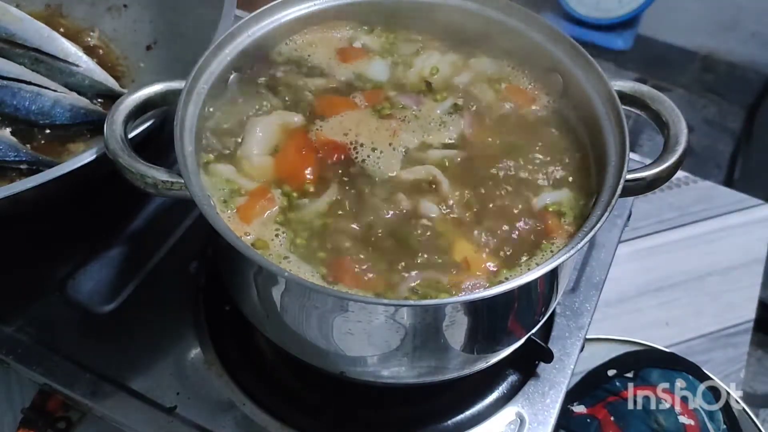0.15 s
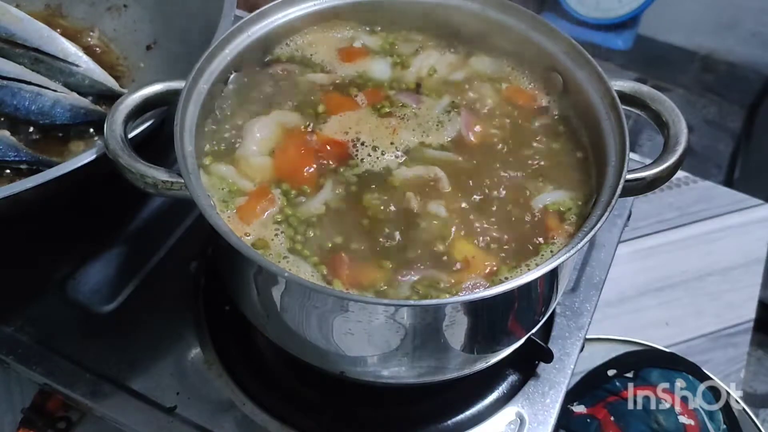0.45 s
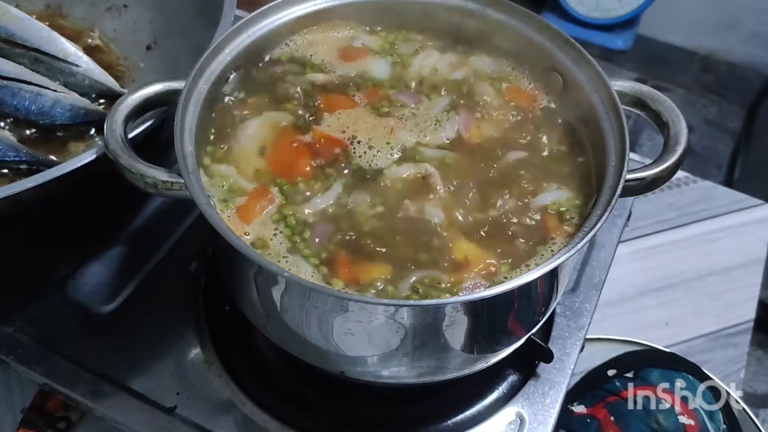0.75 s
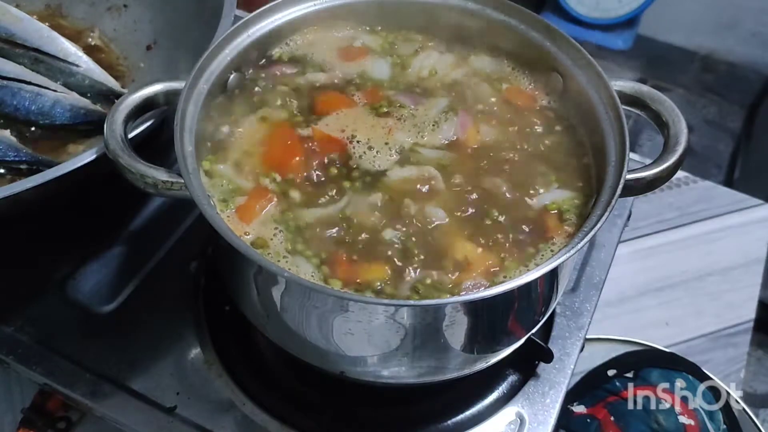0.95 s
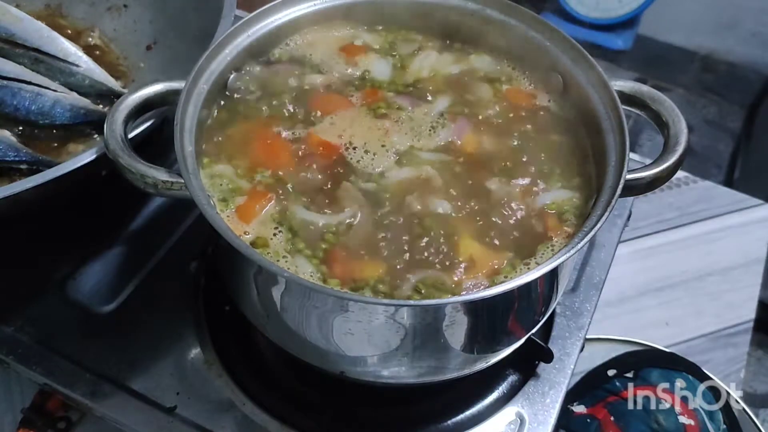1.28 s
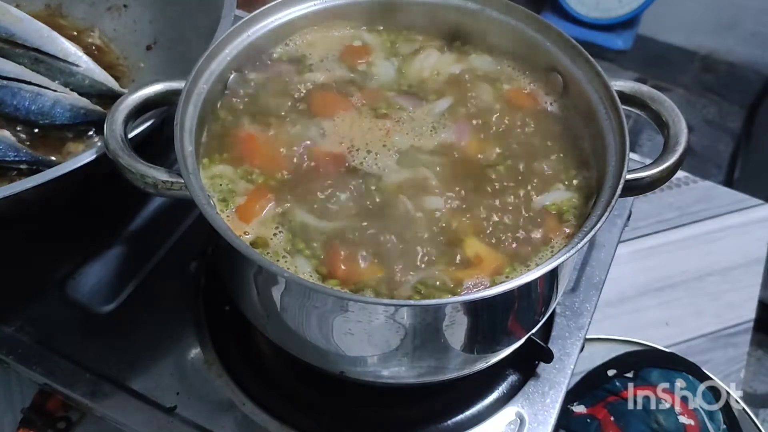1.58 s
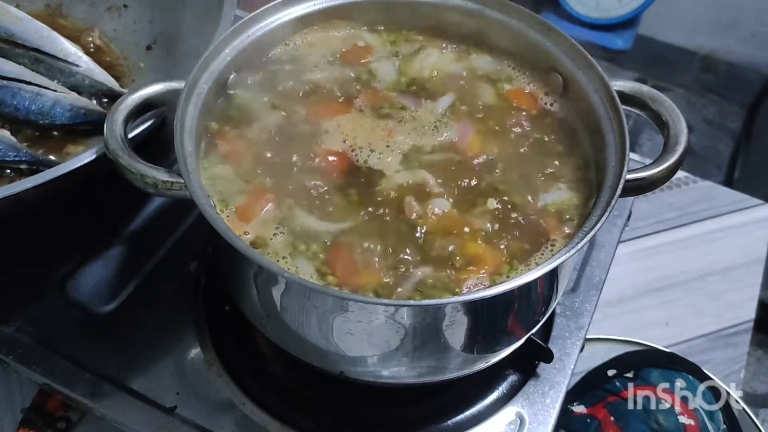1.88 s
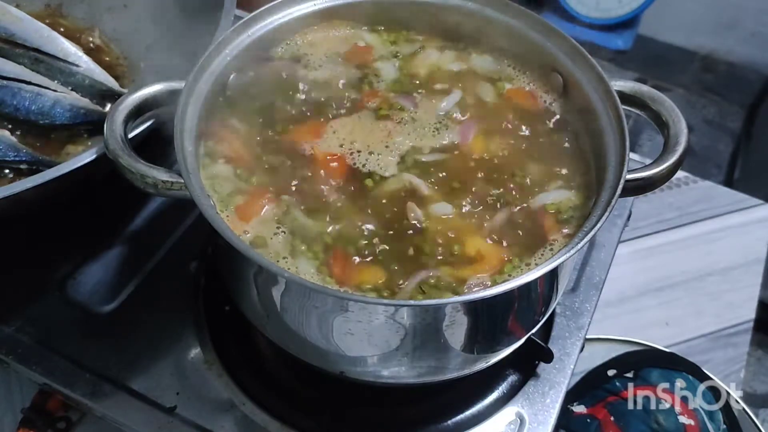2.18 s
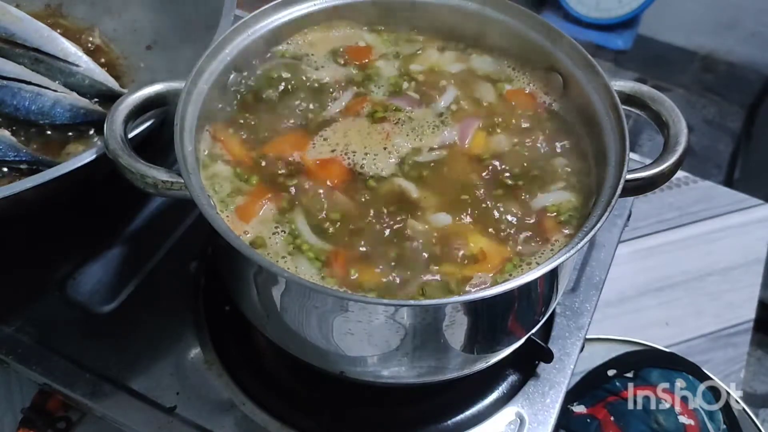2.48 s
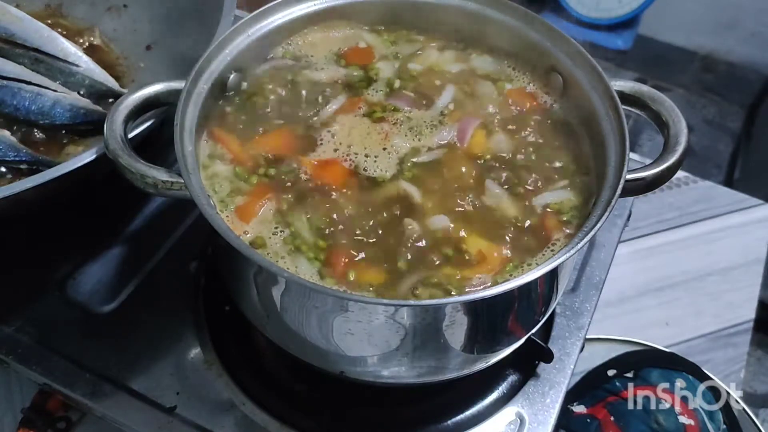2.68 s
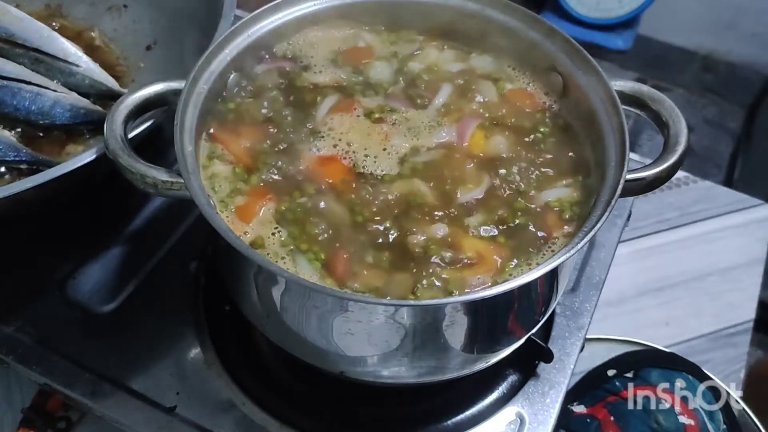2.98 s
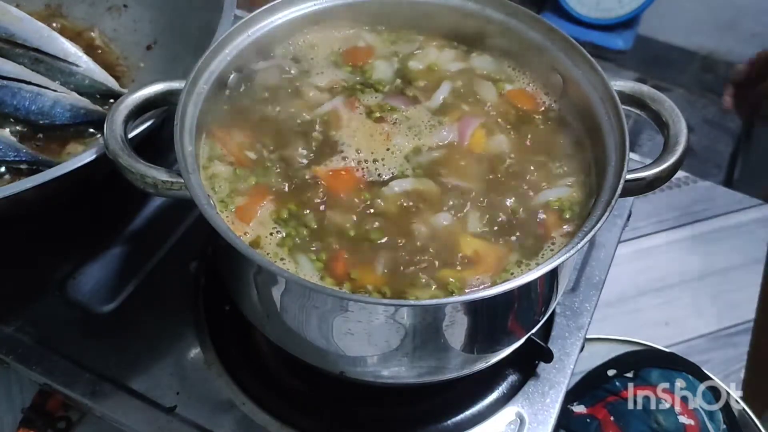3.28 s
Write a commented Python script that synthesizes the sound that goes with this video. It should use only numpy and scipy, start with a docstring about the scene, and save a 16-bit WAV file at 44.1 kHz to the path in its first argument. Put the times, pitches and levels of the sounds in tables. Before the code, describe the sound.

Vegetable soup at a rolling boil in an open steel pot, close stereo microphone in a small kitchen: continuous bright fizzing, fluttering in quick surges, over soft low gurgles and a faint burner hiss.

```python
"""Soup at a rolling boil in an open steel pot, heard from close by through two microphone ports.
Tiny steam bubbles collapse by the thousand on the hot base: random clicks into resonators, raised in
surges and coloured by the ringing pot. Middling bubbles gurgle in clumps the same way, big ones gulp as
rising sine rings, and a few lone collapses snap out. Short reflections surround them; filtered noise
makes the hiss of burner and room."""
import sys
import numpy as np
from scipy import signal
from scipy.fft import rfft, irfft
from scipy.io import wavfile

SR = 44100
rng = np.random.default_rng(int(sys.argv[2]) if len(sys.argv) > 2 else 0)


def inscribe(sig):
    """Save sig as 16-bit PCM at rate SR to the path in sys.argv[1].

    A 1-D sig is mono; a 2-D sig holds one channel per row.
    Samples are clipped to [-1, 1] before scaling.
    """
    pcm = np.round(np.clip(np.atleast_2d(sig).T, -1, 1) * 32767)
    wavfile.write(sys.argv[1], SR, pcm.astype(np.int16))


def to_linear_factor(level_db):
    """Convert decibel levels (scalar or array-like) to linear amplitude factors."""
    exponent = np.asarray(level_db, float) / 20
    return 10 ** exponent


N = 152145   # samples

# Steady fizz of the boil. Each row: time in seconds, relative level in dB.
FIZZ_VIGOUR = [(0.0, -29.5), (0.41, -30), (0.82, -29.5), (1.19, -30.5), (1.41, -29.5), (1.98, -30),
               (2.39, -31), (2.65, -29.5), (3.19, -31), (3.45, -30.5)]
# Surges of collapsing bubbles. Each row: start in seconds, length in seconds, level in dB on the
# scale of the steady fizz, favoured pitch in Hz.
FIZZ_SURGES = [(0.128, 0.017, -21.5, 2970), (0.159, 0.033, -24, 3400), (0.203, 0.041, -26, 2980),
               (0.255, 0.031, -30, 3940), (0.337, 0.04, -25, 2940), (0.455, 0.032, -26.5, 3980),
               (0.495, 0.022, -26, 3300), (0.545, 0.02, -25, 2860), (0.623, 0.025, -31.5, 3800),
               (0.663, 0.0092, -27.5, 4260), (0.758, 0.022, -19.5, 2440), (0.867, 0.043, -32.5, 4130),
               (0.952, 0.043, -27.5, 3590), (1.017, 0.016, -27.5, 3810), (1.157, 0.043, -38, 3120),
               (1.246, 0.028, -23.9, 2800), (1.303, 0.023, -29, 3470), (1.362, 0.037, -28, 3020),
               (1.415, 0.033, -25.3, 2630), (1.515, 0.017, -25.5, 3200), (1.554, 0.031, -30, 4760),
               (1.591, 0.0092, -25.6, 3320), (1.698, 0.046, -30, 3500), (1.782, 0.013, -26.5, 3420),
               (1.886, 0.02, -25.5, 3080), (1.927, 0.026, -28, 3140), (1.969, 0.049, -34.5, 4500),
               (2.045, 0.025, -30.5, 2900), (2.144, 0.065, -27, 2680), (2.245, 0.01, -21.5, 3290),
               (2.264, 0.072, -29, 3250), (2.34, 0.056, -27, 2900), (2.386, 0.01, -29, 2900),
               (2.406, 0.029, -27, 3370), (2.455, 0.014, -21, 2510), (2.484, 0.022, -24, 2870),
               (2.526, 0.033, -29.5, 3000), (2.575, 0.049, -30.5, 4750), (2.724, 0.011, -30, 3030),
               (2.793, 0.01, -25, 3100), (2.832, 0.011, -28, 4230), (2.877, 0.0097, -26.4, 3340),
               (2.967, 0.043, -28.5, 4400), (3.013, 0.028, -29.5, 3520), (3.107, 0.025, -28.5, 2820),
               (3.148, 0.012, -28, 3690), (3.28, 0.01, -24.9, 3640), (3.326, 0.012, -26, 2590),
               (3.36, 0.05, -30.5, 3610), (3.45, 0.012, -16.5, 3920)]
# Colour of the fizz. Each row: frequency in Hz, relative level per Hz in dB.
FIZZ_COLOUR = [(410, -4), (700, -9.5), (884, -23), (1010, -19.5), (1390, -19.5), (2000, -13.5),
               (2300, -7.5), (2550, -5.5), (3100, -5), (3720, -3.5), (4400, -4.5), (6080, -9.5),
               (9940, -23), (14300, -37), (15400, -41)]
# Ring of the pot. Each row: frequency in Hz, width in Hz, lift on the left in dB, lift on the right in dB.
POT_RING = [(2540, 48, 3, 1.5), (3310, 69, 10.5, 3.5), (3610, 100, 0, 5), (3800, 70, 7.5, 5),
            (4970, 150, 1, 3)]
# Colour of the gurgle. Each row: frequency in Hz, relative level per Hz in dB.
GURGLE_COLOUR = [(65, -50), (110, -14), (167, -5), (226, -1), (374, -3.5), (451, -5.5), (497, -3),
                 (668, -6.5), (729, -3.5), (888, -24.5), (1000, -9.5), (1500, -21), (1950, -21),
                 (3300, -120)]
# How busy the gurgling bubbles are. Each row: time in seconds, level of the larger (low) bubbles in dB,
# level of the smaller (high) ones in dB; only the movement around each column's mean counts.
GURGLE_BUSY = [(0.0, -51, -50), (0.22, -49, -54.5), (0.36, -49.5, -49), (0.54, -55.5, -55.5),
               (0.8, -58.5, -51), (0.92, -57, -53.5), (1.09, -51.5, -48), (1.3, -56.5, -55),
               (1.6, -52.5, -53), (1.86, -56, -48), (1.94, -53, -59), (2.08, -57, -50.5), (2.24, -53, -55),
               (2.4, -53.5, -54), (2.66, -52, -53), (3.05, -52.5, -53), (3.45, -52.5, -58)]
# Colour of burner and room. Each row: frequency in Hz, relative level per Hz in dB.
HISS_COLOUR = [(15, -58), (25, -23), (86, -0.5), (224, -6), (437, 3), (718, 16), (882, -44), (1500, -30),
               (1950, -30), (3300, -120)]
# Big bubbles. Each row: start in seconds, relative level in dB, starting pitch in Hz.
BIG_BUBBLES = [(0.018, -38, 236), (0.19, -32, 230), (0.3, -36, 245), (0.39, -41, 174), (0.464, -46, 226),
               (0.764, -30, 634), (1.069, -37.5, 232), (1.13, -30.5, 477), (1.783, -33, 300),
               (2.052, -36, 292), (2.538, -39, 273), (2.786, -30, 252), (2.87, -36, 230), (2.992, -37, 324),
               (3.198, -29, 313)]
# Single bubbles that snap out of the boil. Each row: start in seconds, level in dB before the soft onset.
LONE_SNAPS = [(0.773, -18), (1.246, -11), (1.435, -18), (2.159, -10), (2.248, -9)]
# Likeness of the two channels. Each row: frequency in Hz, likeness from 0 to 1.
CHANNEL_LIKENESS = [(100, 0.1), (5600, 0), (5750, 1), (8200, 0.76), (9200, 0.4), (9900, 0.66), (10500, 0.9),
                    (12800, 0.04), (14000, 0.6)]
# Balance of the two ports. Each row: frequency in Hz, left minus right gain in dB.
PORT_BALANCE = [(60, -2), (200, -1.5), (800, -1), (1500, -5), (2500, -3.5), (3600, -9.5), (5000, -6.5),
                (6300, -6), (8000, -11), (9400, -8.5), (9900, -18), (10500, 7), (11500, 10), (13000, -2),
                (15000, 10)]

FIZZ_PER_S, FIZZ_CYCLES, FIZZ_SIZE_DB = 24000, 65.0, 2.2   # pops, cycles to -60 dB, spread of size
FIZZ_SCATTER_S = .0015   # each bubble reaches the ports at slightly other times
FIZZ_LIFT_DB = 3.5       # whole fizz, surges included, over the mean steady vigour
SHARED_DB, OWN_DB = .4, 1.5   # flicker of all sizes together and of each alone, before the pitch scaling
CALM_ABOVE_HZ = 3500     # flicker is scaled down above this pitch, up below it
SURGE_RISE_S, SURGE_FALL_S = .005, .007
SURGE_OCTAVES, SURGE_OCTAVES_BELOW = 0.66, 1.06   # spread of pitch above and below the centre
GURGLE_PER_S, GURGLE_CYCLES, GURGLE_SIZE_DB = 700, 28.0, 2.3   # as for the fizz
GURGLE_SCATTER_S, GURGLE_SPLIT_HZ = 0.00588, 320
GURGLE_DB, HISS_DB = -46, -58   # rms of each layer
GULP_CYCLES, GULP_LIFT_DB = 18.0, 3.5   # ring length in cycles of the starting pitch; added level
GULP_RISE = .06   # extra share of cycles over the ring: the pitch ends 12 % higher
SNAP_HZ, SNAP_RISE_S, SNAP_T60_S = 3600, .0007, .016   # middle pitch, onset, ring
KITCHEN_T60_S, KITCHEN_DB, MOVES_PER_S = .07, -9, 6   # tail, level against direct sound, drift rate
DIP_SPACING_HZ, DIP_WIDTH_HZ, DIP_DB = 258.4, 40, -4.0   # narrow, evenly spaced dips in the colour
TOP_HZ = 15590


def rms_one(x):
    """Scale to an rms of 1."""
    return x / np.sqrt(np.mean(x ** 2) + 1e-20)


def at_hz(points, hz):
    """Read a curve of (Hz, value) points along log frequency."""
    points = np.array(points)
    return np.interp(np.log(hz), np.log(points[:, 0]), points[:, 1])


def bins_hz():
    """Frequencies of the spectrum bins, kept at 1 Hz or more for the logarithm."""
    return np.maximum(np.arange(N // 2 + 1) * SR / N, 1.)


def colour(x, db):
    """Filter by a gain in dB given on the bins."""
    return irfft(rfft(x) * to_linear_factor(db), N)


def drift(rate):
    """Slow random wander of spread 1: noise through a double low-pass at rate in Hz."""
    r = np.exp(-80 * np.pi * rate / SR)   # runs at one point per 40 samples
    noise = rng.standard_normal(N // 40 + 2002)
    slow = signal.lfilter([1], [1, -2 * r, r * r], noise)[2000:]   # settled part
    return np.interp(np.arange(N) / 40, np.arange(len(slow)), rms_one(slow))


def bubbles(per_s, size_db, cycles, scatter_s, pitches, level_of):
    """Random pops dealt to resonators; both ports get each pop, with own lag and sign."""
    draw = rng.random((int(4 * per_s), 7))[:int(per_s * N / SR)]
    at = draw[:, 0] * N
    dealt = (draw[:, 1] * len(pitches)).astype(int)
    size = to_linear_factor(size_db * np.minimum(-np.log(draw[:, 2] + 1e-9), 4))   # few large, many small
    out = np.zeros((2, N))
    for k, hz in enumerate(pitches):
        mine = dealt == k
        clicks = np.full((2, N), 1e-18)
        for side in range(2):
            lag = draw[mine, 3 + side] * scatter_s * SR
            sign = np.sign(draw[mine, 5 + side] - .5)
            i = np.clip(at[mine] + lag, 0, N - 1).astype(int)
            np.add.at(clicks[side], i, size[mine] * sign)
        r = to_linear_factor(-60 * hz / (cycles * SR))   # decay per sample
        w = 2 * np.pi * hz / SR
        resonator = [1 - r * r, 0, r * r - 1], [1, -2 * r * np.cos(w), r * r]
        out += signal.lfilter(*resonator, clicks * level_of(hz))
    return out


def fizz():
    """Small collapsing bubbles: steady vigour plus surges that favour one size; coloured by the pot."""
    t = np.arange(N) / SR
    shared = SHARED_DB * drift(4.3)
    steady = to_linear_factor(np.interp(t, *np.transpose(FIZZ_VIGOUR))) ** 2
    surges = []
    for s, length, db, centre in FIZZ_SURGES:
        part = slice(max(int((s - .02) * SR), 0), int((s + length + .03) * SR))
        rise = np.tanh((t[part] - s) / SURGE_RISE_S)
        fall = np.tanh((t[part] - s - length) / SURGE_FALL_S)
        surges.append((part, np.maximum(rise - fall, 0) / 2 * to_linear_factor(db) ** 2, centre))

    def level_of(hz):
        """Loudness over time of the bubbles at one pitch."""
        power = steady.copy()
        for part, extra, centre in surges:
            octaves = SURGE_OCTAVES if hz > centre else SURGE_OCTAVES_BELOW
            power[part] += extra * np.exp(-(np.log2(hz / centre) / octaves) ** 2)
        flicker = (shared + OWN_DB * drift(9.9)) * min(1.6, CALM_ABOVE_HZ / hz)
        return np.sqrt(power) * to_linear_factor(flicker)

    pitches = np.geomspace(800, 15000, num=60)
    pops = bubbles(FIZZ_PER_S, FIZZ_SIZE_DB, FIZZ_CYCLES, FIZZ_SCATTER_S, pitches, level_of)
    hz = bins_hz()
    ring = sum(np.array([[left], [right]]) / (1 + (2 * (hz - f) / width) ** 2)
               for f, width, left, right in POT_RING)
    coloured = colour(pops, at_hz(FIZZ_COLOUR, hz) + ring)
    return rms_one(coloured) * np.sqrt(steady.mean()) * to_linear_factor(FIZZ_LIFT_DB)


def gurgle():
    """Many middling bubbles ring in clumps; each size also swells and fades alone."""
    clumps = to_linear_factor(1.0 * drift(11.0))
    s, *swells = np.transpose(GURGLE_BUSY)
    busy = [to_linear_factor(np.interp(np.arange(N) / SR, s, db - db.mean())) for db in swells]

    def level_of(hz):
        """Loudness over time of the bubbles at one pitch."""
        return busy[int(hz > GURGLE_SPLIT_HZ)] * clumps * to_linear_factor(1.06 * drift(9.5))

    pitches = np.geomspace(130, 1400, num=26)
    pops = bubbles(GURGLE_PER_S, GURGLE_SIZE_DB, GURGLE_CYCLES, GURGLE_SCATTER_S, pitches, level_of)
    return to_linear_factor(GURGLE_DB) * rms_one(colour(pops, at_hz(GURGLE_COLOUR, bins_hz())))


def hiss():
    """Smooth burner and room noise: random noise, filtered, separate on each side."""
    noise = rng.standard_normal((2, N))
    return to_linear_factor(HISS_DB) * rms_one(colour(noise, at_hz(HISS_COLOUR, bins_hz())))


def gulps():
    """A big bubble rings briefly with rising pitch as it nears the surface."""
    out = np.zeros((2, N + SR))
    for (s, db, hz), turn in zip(BIG_BUBBLES, rng.random((len(BIG_BUBBLES), 2))):
        c = np.arange(int(GULP_CYCLES / hz * SR)) * hz / SR   # cycles of the starting pitch
        shape = (1 - np.exp(-c / 2.3)) ** 2 * to_linear_factor(-40 * c / GULP_CYCLES)
        rising = c * (1 + GULP_RISE * c / GULP_CYCLES)
        tone = np.sin(2 * np.pi * (rising + turn[:, None]))   # own phase at each port
        start = int(s * SR)
        out[:, start:start + len(c)] += to_linear_factor(db + GULP_LIFT_DB) * shape * tone
    return out[:, :N]


def snaps():
    """A lone collapse rings and dies fast, with its own pitch and phase at each port."""
    out = np.zeros((2, N))
    t = np.arange(int(SNAP_T60_S * SR)) / SR
    for (s, db), draw in zip(LONE_SNAPS, rng.random((len(LONE_SNAPS), 2, 2))):
        hz = SNAP_HZ * (.85 + .3 * draw[0, :, None])
        shape = (1 - np.exp(-t / SNAP_RISE_S)) ** 2 * to_linear_factor(db - 60 * t / SNAP_T60_S)
        tone = np.sin(2 * np.pi * (hz * t + draw[1, :, None]))
        start = int(s * SR)
        out[:, start:start + len(t)] += shape * tone
    return out


def kitchen(x):
    """Dense short reflections from pot walls and tiles; they change as the boil moves among four places."""
    n = np.arange(int(KITCHEN_T60_S * SR))
    tails = rng.standard_normal((4, 2, len(n))) * to_linear_factor(-60 * n / len(n))
    tails *= to_linear_factor(KITCHEN_DB) / np.sqrt(np.sum(tails ** 2, axis=2, keepdims=True))
    places = np.array([drift(MOVES_PER_S) for _ in tails])
    places /= np.sqrt(np.sum(places ** 2, axis=0))   # constant total power
    wet = sum(signal.fftconvolve(x * place, tail, axes=1)[:, :N] for place, tail in zip(places, tails))
    return (x + wet) / np.sqrt(1 + to_linear_factor(KITCHEN_DB) ** 2)


def scene():
    """All bubbles with their reflections, over the hiss."""
    return kitchen(fizz() + gurgle() + gulps() + snaps()) + hiss()


def low_pass(x):
    """Removes everything above the highest recorded frequency."""
    return signal.sosfilt(signal.butter(12, 15590, fs=SR, output="sos"), x)


def record(dry):
    """Likeness of the channels varies with pitch, ports differ in colour, dips comb both, the top is cut."""
    hz = bins_hz()
    left, right = rfft(dry)
    alike = np.clip(at_hz(CHANNEL_LIKENESS, hz), 0, 1)
    pair = np.array([np.sqrt(1 - alike ** 2) * left + alike * right, right])
    pair = pair * to_linear_factor(at_hz(PORT_BALANCE, hz) / 2 * [[1], [-1]])
    off_centre = hz % DIP_SPACING_HZ - DIP_SPACING_HZ / 2
    dips = DIP_DB / (1 + (2 * off_centre / DIP_WIDTH_HZ) ** 4)
    mix = irfft(pair * to_linear_factor(dips) * (hz < TOP_HZ), N)
    return low_pass(mix)


dry = scene()
out = record(dry)
inscribe(out)
```